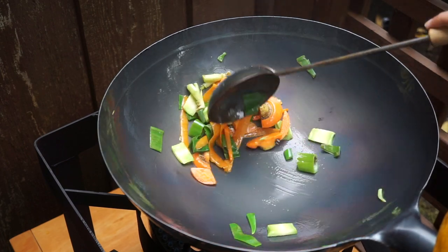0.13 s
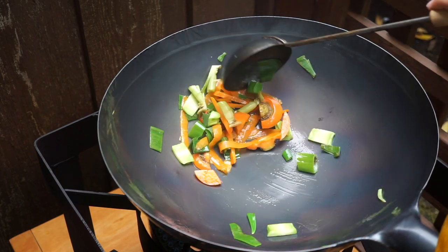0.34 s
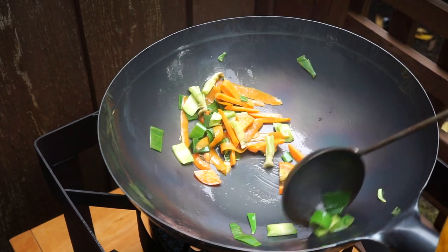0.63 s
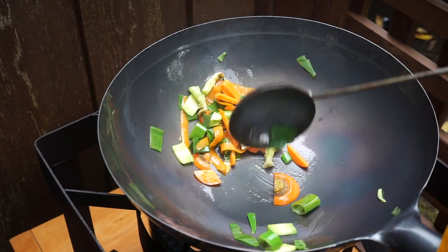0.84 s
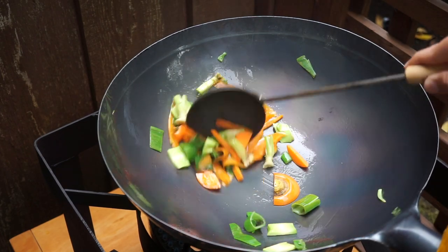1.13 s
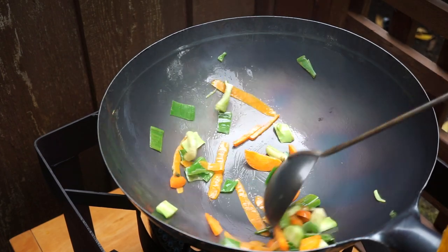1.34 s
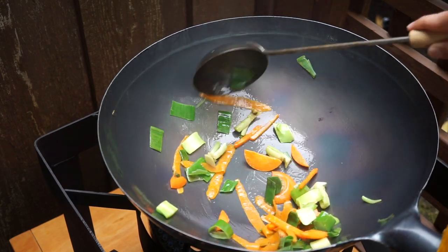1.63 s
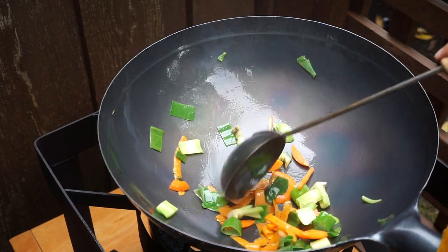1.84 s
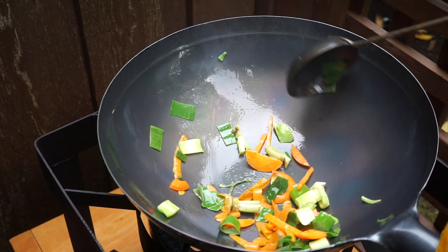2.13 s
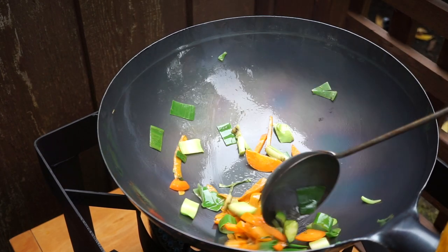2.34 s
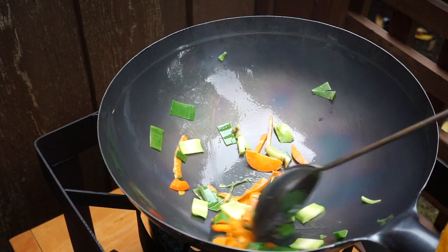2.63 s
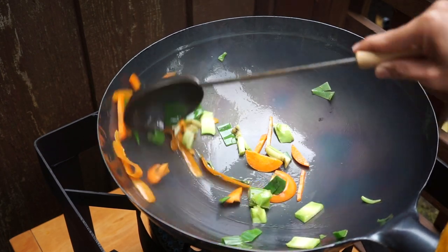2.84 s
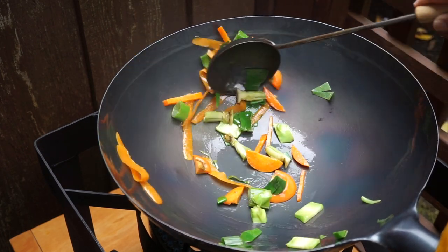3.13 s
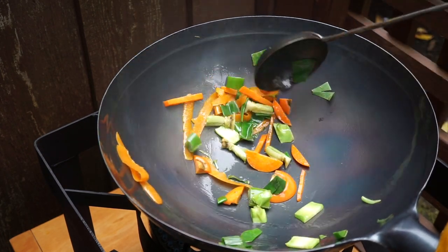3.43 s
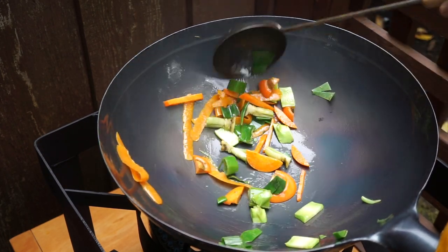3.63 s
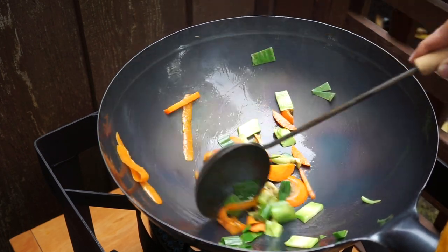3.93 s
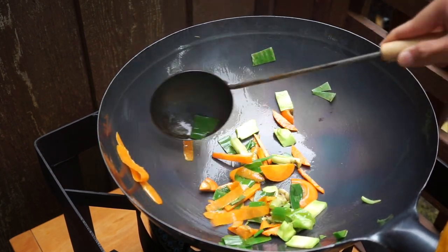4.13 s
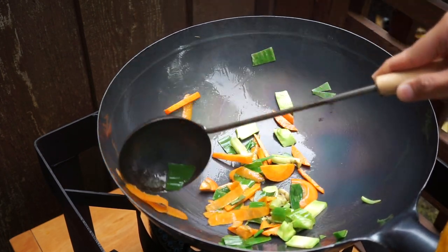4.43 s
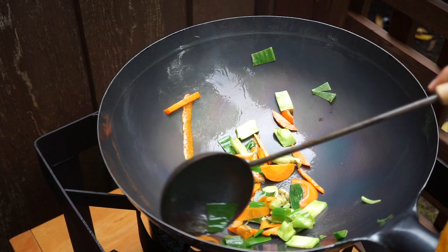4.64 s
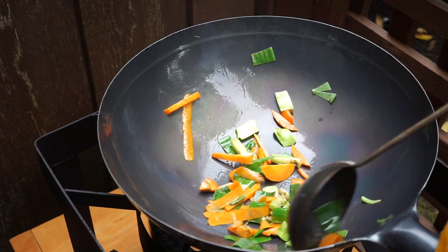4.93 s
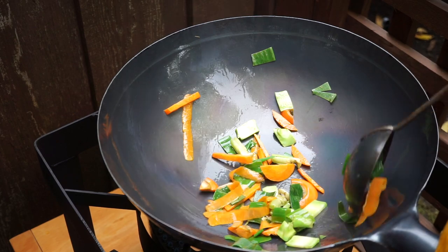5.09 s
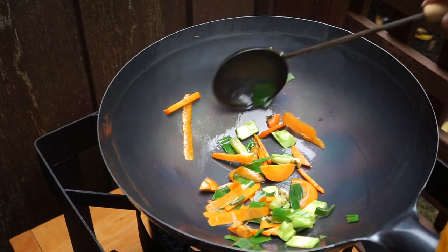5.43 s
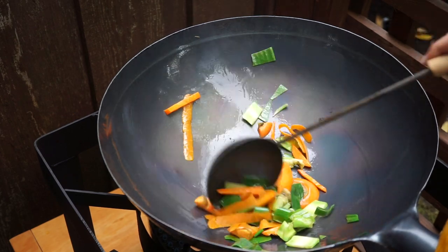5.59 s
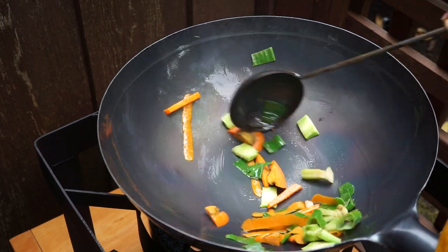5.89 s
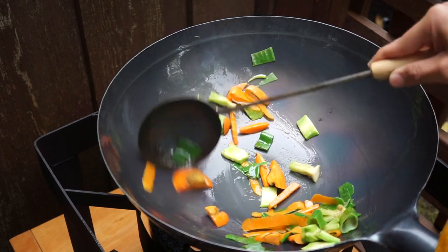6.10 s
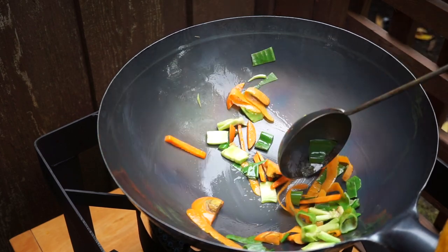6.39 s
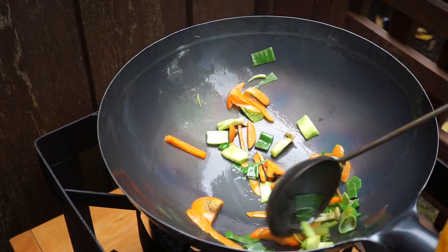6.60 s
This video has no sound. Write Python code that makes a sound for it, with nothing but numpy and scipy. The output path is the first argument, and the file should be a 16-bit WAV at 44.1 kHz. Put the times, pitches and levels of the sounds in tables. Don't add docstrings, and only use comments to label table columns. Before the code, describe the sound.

Heard very close in stereo outdoors, vegetables fry in a steel wok: constant bright steam hiss, dense fine crackle, duller bubbles and sharp random spits, slightly left of centre. A short ladle rasp opens it. At 0.4 s a hard clack and deep hollow boom start a gritty, squealing scrape lasting to about 0.75 s, leaving a thin faint rim ring. Quick knocks with low thuds come at 1.1-1.25 s, then a sharp clack at 1.7. From 2.1 to 2.35 s another strong scrape squeals; a softer drag follows at 2.65. Short rasps and clanks fall at 3.2-3.9 s. From 4.4 to 5.1 s there are only light ticks over sizzling and spits. Scraping returns with a squeal at 5.35, a knock at 5.65, a softer drag at 5.85 and a bright rasp at 6.3, then small taps while frying continues. Faint burner and air rumble stays behind.

```python
import sys
import numpy as np
from scipy import signal
from scipy.fft import rfft, irfft, next_fast_len
from scipy.io import wavfile
from scipy.ndimage import uniform_filter1d, map_coordinates

SR = 44100
rng = np.random.default_rng(int(sys.argv[2]) if len(sys.argv) > 2 else 0)


def transcribe(signal):
    frames = np.atleast_2d(signal).T
    limited = np.clip(frames, -1, 1)
    pcm = np.round(limited * 32767).astype(np.int16)
    wavfile.write(sys.argv[1], SR, pcm)


def gain_from_db(level_db):
    decades = np.asarray(level_db, float) / 20
    return 10 ** decades


N = 297675


def unit(x):
    return x / np.sqrt(np.mean(x ** 2) + 1e-20)


def along(points, hz):
    f, v = np.transpose(points)
    return np.interp(np.log(hz + 1), np.log(f + 1), v)


def curves(rows):
    start_s, *columns = np.transpose(rows)
    return [np.interp(np.arange(N) / SR, start_s, column) for column in columns]


def wobble(rate):
    knots = rng.standard_normal(int(N * rate / SR) + 4)
    return map_coordinates(knots, [np.arange(N) * rate / SR])


def filtered(x, response):
    m = next_fast_len(N + SR // 2)
    return irfft(rfft(x, m) * response(np.fft.rfftfreq(m, 1 / SR)), m)[..., :N]


def above(corner_hz, order):
    return lambda hz: (1j * hz / (corner_hz + 1j * hz)) ** order


def modes(table):
    def response(f):
        total = 0
        for k, (centre, width, db) in enumerate(table):
            resonance = 1j * f * width / (centre * centre - f * f + 1j * f * width)
            total = total + (-1) ** k * gain_from_db(db) * resonance
        return total
    return response


# pitch_hz, correlation
LIKENESS = [(25, .98), (80, .98), (150, .993), (300, .988), (600, .76), (1400, .78), (2800, .64),
            (5600, .5), (10000, .46), (14000, .2)]


def pair(a, b, colour):
    def response(hz):
        turn = np.arccos(np.clip(along(LIKENESS, hz), -1, 1)) / 2
        return colour(hz) * [np.cos(turn), np.sin(turn)]
    mid, side = filtered(np.array([a, b]), response)
    return np.array([mid + side, mid - side])


def swells(start_s, length_s, db, fade_db_per_s, slope_db=0, rise_s=.03):
    t = np.arange(N)[::32] / SR - np.asarray(start_s)[:, None]
    col = lambda v: np.reshape(v, (-1, 1))
    level_db = col(db) + col(slope_db) * np.clip(t / col(length_s), 0, 1)
    level_db = level_db - col(fade_db_per_s) * np.clip(t - col(length_s), 0, None)
    return gain_from_db(level_db) * np.clip(1 + t / col(rise_s), 0, 1) ** 2


def summed(gains):
    return np.interp(np.arange(N), np.arange(N)[::32], gains.sum(axis=0))


# centre_s, change_db, half_width_s
FLARES_AND_LULLS = [(0.039, -9, 0.039), (.345, -3.5, 0.046), (.43, -5.5, 0.024), (.82, -3.5, 0.038),
                    (1.62, -1.5, 0.056), (1.666, -4, .01), (2.1, -3, .012), (2.68, -4, 0.037), (4.157, -7, 0.029),
                    (4.3, 1, 0.028), (2.06, 0, 0.097), (2.6, -1, .03), (3.44, 5, 0.042), (3.53, -2, 0.026),
                    (3.72, -2, 0.039), (4.24, -4.5, 0.014), (4.7, -6.5, 0.025), (5.27, -6.5, 0.055),
                    (5.335, -6.5, 0.017), (5.495, -5.5, 0.045), (5.58, 3.5, 0.018), (5.7, -5.5, 0.021),
                    (6.27, -2, 0.018)]
# start_s, sizzle_db, large_bubbles_db (against the sizzle)
FRYING = [(0.0, -29, -7.5), (0.6, -32.5, -42), (0.75, -34, -19.5), (1.0, -34, -20), (1.39, -31.5, -23.5),
          (1.99, -36, -20), (2.56, -33.5, -21.5), (2.99, -31.5, -22.5), (3.36, -34.5, -20.5),
          (3.55, -36.5, -22), (3.76, -36, -22), (3.97, -32, -20), (4.68, -35, -24), (5.49, -33.5, -22.5),
          (5.71, -35, -17.5), (5.96, -29.5, -21.5), (6.75, -34.5, -26)]


def heat():
    sizzle_db, bubbles_db = curves(FRYING)
    t = np.arange(N) / SR
    sizzle_db = sizzle_db + 2.5
    for start_s, change_db, half_width_s in FLARES_AND_LULLS:
        sizzle_db = sizzle_db + change_db * np.exp(-((t - start_s) / half_width_s) ** 2)
    full_stroke = gain_from_db(-26.5)
    stir_db = 3.5 * np.tanh(sliding()[0] / full_stroke)
    return sizzle_db + stir_db, sizzle_db + bubbles_db


# start_s, peak_db, pitch_hz
SPITS = [(0.1904, -13, 8700), (0.2404, -13, 13700), (0.3104, -14, 9640), (0.4834, -16, 13700),
         (0.8016, -13, 12800), (1.0889, -14, 13100), (1.5948, -12, 10600), (2.4423, -14, 13300),
         (2.5222, -13, 13400), (2.5765, -12, 12600), (2.8984, -13, 11400), (3.0624, -14, 12500),
         (3.5004, -15, 13700), (3.8901, -13, 13700), (4.1126, -13, 13700), (4.1274, -13, 13300),
         (4.1445, -14, 13800), (4.2173, -13, 11800), (4.3344, -14, 13700), (4.4643, -14, 12900),
         (4.595, -11.5, 13900), (4.6803, -15, 13900), (5.0454, -14, 13600), (5.2111, -13, 13400),
         (5.2465, -15, 12500), (5.4645, -11, 13800), (6.0664, -13, 10100), (6.1614, -13, 13900),
         (6.2394, -12, 12400), (6.4384, -17, 13400),
         (1.5565, -17, 7500),
    (2.9092, -14, 7500),
    (5.2021, -16.5, 13400),
    (5.3279, -15, 8300),
    (5.3279, -13, 13000),
    (5.3347, -15, 13200),
    (5.5612, -16, 11700),
]


def spitting(strays=70):
    start_s, db, hz = np.transpose(SPITS)
    u = rng.random((strays, 3))
    start_s = np.r_[start_s + .001, u[:, 0] * N / SR]
    return start_s, np.r_[db, -17 + 3 * u[:, 1]], np.r_[hz, 12500 * (.85 + .25 * u[:, 2])]


def bursts(start_s, hz, cycles, size, pan_db, lag_s, length=96):
    out = []
    for ear in (.5, -.5):
        start = (start_s + ear * lag_s) * SR
        at = np.ceil(start)[:, None] + np.arange(length)
        turns = (at - start[:, None]) / SR * hz[:, None]
        wave = np.sin(2 * np.pi * turns) * np.exp(-turns / cycles[:, None])
        wave = (size * gain_from_db(ear * pan_db))[:, None] * wave
        places = np.clip(at, 0, N).astype(int)
        out.append(np.bincount(places.ravel(), wave.ravel(), N + 1)[:N])
    return np.array(out)


def crackle(count, centre_hz, spread, cycles, uneven_db, tilt=0):
    u, g = rng.random((count, 2)), rng.standard_normal((count, 4))
    hz = np.clip(centre_hz * np.exp(spread * g[:, 0]), 900, 15600)
    size = gain_from_db(-uneven_db * np.log(1 - u[:, 1] * .92)) * (hz / centre_hz) ** tilt
    damping = cycles * np.exp(0.21 * g[:, 1])
    return bursts(u[:, 0] * N / SR, hz, damping, size, 0.38 * g[:, 2], 3e-5 * g[:, 3])


def splash(x, wet_db, t60, count=6):
    t = np.arange(1, 300) / SR
    spot = np.repeat(rng.integers(count, size=N // 128 + 1), 128)[:N]
    haze = 0
    for k in range(count):
        tail = rng.standard_normal(len(t)) + 0.45 * rng.standard_normal((2, len(t)))
        tail = tail * gain_from_db(-60 * t / t60)
        tail = tail / np.linalg.norm(tail[0])
        haze = haze + signal.oaconvolve(x * (spot == k), tail, axes=1)[:, :N]
    wet = x + gain_from_db(wet_db) * haze
    fence = np.roll(wet, round(.00215 * SR), axis=1)
    return wet + gain_from_db([[-7], [-13]]) * fence


# pitch_hz, level_db (per Hz)
STEAM = [(240, -65), (400, -61), (787, -27), (1020, -18), (1750, -21), (2380, -13), (2780, -12),
         (4140, -5.5), (5470, -7), (14000, 4), (15800, -1.5)]


def sizzle():
    level_db, dull_db = heat()
    flare_db = 1.37 * wobble(25) + 1.06 * wobble(70)
    steam = unit(pair(*rng.standard_normal((2, N)), lambda hz: gain_from_db(along(STEAM, hz))))
    pops = crackle(count=8000, centre_hz=12500, spread=.25, cycles=1.5, uneven_db=5.8, tilt=.4)
    pops = unit(filtered(pops, above(3140, order=3)))
    dull = crackle(count=9000, centre_hz=3600, spread=.45, cycles=1.6, uneven_db=3.5)
    dull = unit(filtered(dull, above(1240, order=4)))
    start_s, db, hz = spitting()
    g = rng.standard_normal((len(start_s), 2))
    cycles = np.full(len(start_s), 1.7)
    spits = bursts(start_s, np.clip(hz, 900, 14500), cycles, gain_from_db(db + 4.7), 1.2 * g[:, 0] + .8, 1e-5 * g[:, 1])
    spits = filtered(spits, above(2600, order=4))
    bubbles = gain_from_db(level_db + flare_db - 5) * pops + gain_from_db(dull_db + flare_db) * dull + spits
    bubbles = filtered(splash(bubbles, wet_db=-3.5, t60=0.0072), above(770, order=3))
    frying = gain_from_db(level_db + flare_db - 0.5) * steam + bubbles
    return frying * gain_from_db([[.45], [-.45]])


# start_s, length_s, rasp_db, swell_db (along the stroke), cup_hum_db (against the rasp)
STROKES = [(0.0, 0.059, -29.5, -9.5, -16.5), (0.38, 0.15, -30.5, -5.5, -15.5), (0.534, 0.22, -28.5, 1, -38),
           (.81, 0.18, -44, -1, -14), (1.089, 0.14, -43.5, 0, -15), (1.235, 0.059, -33, 3, -17.5),
           (1.674, 0.031, -27.5, -17, -13), (1.726, 0.11, -43.5, -2, -17), (2.11, 0.24, -30.5, 5, -25.5),
           (2.64, 0.37, -38, -0.5, -15), (3.225, 0.07, -35, 0, -22), (3.398, .045, -33, 0.5, -19),
           (3.747, 0.038, -27.5, -9.5, -18), (3.833, 0.2, -29, -21, -23), (5.365, 0.064, -26.5, -1, -30),
           (5.571, 0.22, -44.5, 2, -17), (5.826, 0.28, -37.5, -11, -13.5), (6.296, 0.11, -26, -10, -25.5)]


def sliding():
    start_s, length_s, db, swell_db, hum_db = np.transpose(STROKES)
    start_s, rise_s = struck(start_s, soft_s=0.022)
    gains = swells(start_s, length_s, db, 400, swell_db, rise_s)
    return np.array([summed(gains), summed(gains * gain_from_db(hum_db)[:, None])])


def grit(density):
    catches = rng.random(N) < density
    return unit(rng.standard_normal(N) * (1 + 6 * catches))


def patchy(x, depth_db):
    z = signal.stft(x, nperseg=256)[2]
    field = uniform_filter1d(rng.standard_normal(z.shape[1:]), size=3, axis=0)
    field = uniform_filter1d(field, size=12, axis=1)
    return signal.istft(z * gain_from_db(depth_db * unit(field)), nperseg=256)[1][:, :N]


# start_s, edge_hz
EDGE = [(0, 3000), (.38, 3720), (.5, 3700), (.56, 3350), (.62, 3750), (.8, 3650), (1.25, 3300), (1.7, 3700),
        (2.2, 3340), (2.33, 3400), (2.36, 3900), (3.25, 3580), (3.42, 2900), (3.76, 4000), (3.85, 3000),
        (5.4, 2850), (6.3, 3700), (6.38, 3250)]


def radiated(x):
    hz, t, z = signal.stft(x, SR, nperseg=256)
    edge_hz = np.interp(t, *np.transpose(EDGE))
    z = z / np.sqrt(1 + (edge_hz / (hz[:, None] + 1)) ** 16)
    return signal.istft(z, SR, nperseg=256)[1][:, :N]


# pitch_hz, width_hz, level_db
WALL = [(2980, 160, -6.5), (3150, 44, -7), (3515, 67, 0.5), (3914, 110, 2.5), (4040, 33, 4.5),
        (4260, 230, 2.5), (4543, 160, 3), (4420, 25, -6), (4745, 64, 2.5), (5106, 137, 4.5), (5480, 107, 2),
        (5800, 300, -6), (6440, 110, -5), (6390, 450, 2.5), (7400, 700, -6), (6860, 120, -7),
        (8630, 370, -3.5), (8910, 340, -2), (10900, 1000, -4.5), (13300, 1400, -7)]
# pitch_hz, width_hz, level_db
CUP = [(1095, 77, -0.5), (1267, 18, 4.5), (1695, 140, 4), (2110, 48, 6.5), (2604, 42, 6.5)]


def ladle():
    force, hum = sliding() * gain_from_db(1.2 * wobble(60) - 1.5)
    cup, wall = modes(CUP), modes(WALL)
    rub = np.array([grit(.006), grit(.0066)])
    blows, shake = np.zeros((2, N)), rng.standard_normal((2, N))
    t = np.arange(400) / SR
    for start_s, db, _, ring_db, _ in KNOCKS:
        blow = gain_from_db(db + ring_db - 1.5 - 60 * t / 0.0033) * rng.standard_normal((2, 400))
        blows[:, round(start_s * SR):][:, :400] += blow
    drive = (patchy(force * rub, depth_db=2) + blows) / np.std(filtered(rub[0], wall))
    rasp = radiated(pair(*drive, wall))
    cup_drive = gain_from_db(-0.5) * hum * shake / np.std(filtered(shake[0], cup))
    return rasp + pair(*cup_drive, cup)


# start_s, length_s, pitch_hz, level_db
SQUEALS = [(.378, 0.032, 4620, -35), (.385, .03, 250, -39), (.405, .03, 195, -37.5), (.5, .09, 190, -50),
           (0.533, 0.03, 4400, -37), (.575, 0.033, 4900, -38), (0.63, 0.07, 215, -45.5),
           (.74, 0.073, 240, -44.5), (0.64, 0.054, 5120, -37), (.65, 0.047, 4180, -37),
           (0.714, 0.036, 5100, -38), (0.602, 0.16, 6310, -38.5), (1.103, .05, 190, -37),
           (1.252, 0.034, 195, -37.5), (1.245, 0.048, 3490, -42.5), (2.645, .12, 440, -57),
           (1.675, 0.034, 5000, -39), (2.11, 0.035, 5040, -40), (2.13, 0.13, 835, -57.5),
           (2.15, .13, 1280, -56.5), (2.13, 0.084, 1410, -58), (2.21, .13, 1050, -59.5),
           (2.165, 0.027, 215, -36.5), (2.19, 0.065, 3515, -37.5), (2.2, 0.05, 5040, -35),
           (2.23, .04, 4400, -32), (2.21, .07, 6600, -40), (2.317, 0.033, 6240, -36),
           (2.32, .02, 4250, -37), (2.345, 0.042, 3950, -38), (2.35, 0.027, 215, -50),
           (3.747, 0.036, 4350, -38.5), (3.842, 0.0082, 4000, -27.5), (5.374, 0.095, 5058, -40),
           (5.35, 0.045, 4100, -39), (5.362, .035, 11300, -35), (5.41, .03, 3850, -39),
           (5.365, 0.06, 1690, -48), (5.38, 0.04, 1100, -55.5), (5.37, 0.052, 6445, -39),
           (6.115, 0.033, 4100, -41.5), (6.296, 0.013, 4420, -39), (6.296, .015, 4880, -39),
           (7.3, .02, 6750, -41), (6.31, .035, 3900, -37), (6.35, .012, 5420, -37), (6.36, .015, 5030, -39),
           (6.35, 0.025, 2150, -51), (6.37, .05, 1260, -59), (6.395, .015, 3600, -43)]


def squeal():
    start_s, length_s, hz, db = np.transpose(SQUEALS)
    start_s, rise_s = struck(start_s, soft_s=.008)
    fade_db_per_s = np.where(hz < 400, 262, 800)
    gains = swells(start_s, length_s, db, fade_db_per_s, rise_s=rise_s)
    t = np.arange(N) / SR
    shiver = np.array([wobble(150), wobble(150)])
    flutter = np.array([wobble(70), wobble(70)])
    lines = 0
    for gain, f in zip(gains, hz):
        phase = 2 * np.pi * f * t + min(f / 2500, 1.5) * shiver + f
        lines = lines + summed(gain[None]) * np.sin(phase)
    return pair(*(lines * gain_from_db(2.5 + 2.5 * flutter)), np.ones_like)


# start_s, peak_db, pitch_hz
HANDLE_TICK = (3.006, -28, 3220)
# start_s, peak_db, boom_db, ring_db (both against the peak), clink_hz
KNOCKS = [(0.06, -32, -36, -6, 2440), (0.3773, -21.5, -5, 8, 940), (.39, -29, -30, 0, 2200),
          (.8486, -34, -40, -4, 3300), (1.089, -32.5, 9, -8, 3150), (1.113, -24.5, -2, 3.5, 3150),
          (1.171, -33, 1, 6, 1840), (1.239, -24.5, -2, 6, 2750), (1.346, -34.5, -27, -9, 2680),
          (1.6745, -23.5, -6.5, 0, 2370), (2.11, -27.5, 1.5, 15, 1900), (2.156, -30, 4, -4, 2030),
          (2.333, -37, -30, 0, 3900), (2.643, -32, 2, -1, 3120), (3.312, -28, -24, -9, 2310),
          (3.435, -31, -11, -9, 2920), (3.7475, -28, -8, 8, 2920), (3.841, -27, -15, 12, 917),
          (4.435, -42, -40, -9, 1200), (4.742, -39, -40, -9, 2500), (4.869, -28.5, -40, -7, 2340),
          (4.965, -33.5, -40, -9, 1900), (5.025, -31, -40, -7, 2400), (5.092, -39, -30, -9, 1410),
          (5.66, -23, -12, 6.5, 2960), (6.24, -29.5, -33, 2, 2730), (6.44, -34, -40, 4, 4800),
          (6.499, -31.5, -30, -4, 2220)]


def knocks():
    clack, deep, clink = np.zeros((2, N)), np.zeros((2, N)), np.zeros(N)
    t = np.arange(900) / SR
    for start_s, db, _, _, hz in KNOCKS:
        at = round(start_s * SR)
        crack = gain_from_db(db + 6.5 - 60 * t / .012) * (rng.standard_normal((2, 900)) + 5 * (t == 0))
        clack[:, at:][:, :900] += crack
        deep[:, at:][:, :900] += gain_from_db(0.4 * (db + 22)) * crack
        tone = np.sin(2 * np.pi * hz * t) * (1 - np.exp(-t / 0.00035))
        clink[at:][:900] += gain_from_db(db - 9.5 - 60 * t / 0.034) * tone
    start_s, db, hz = HANDLE_TICK
    tone = np.sin(2 * np.pi * hz * t) * (1 - np.exp(-t / 0.0007))
    clink[round(start_s * SR):][:900] += gain_from_db(db - 60 * t / 0.035) * tone
    broad = modes([(2300, 1800, -3), (5000, 4000, -5)])
    clack = pair(*clack, lambda hz: broad(hz) * above(900, order=2)(hz) * 1.3)
    return clink + clack + pair(*deep, modes([(1050, 450, -4)]))


def struck(start_s, soft_s):
    blows = np.transpose(KNOCKS)[0]
    nearest = blows[np.abs(start_s[:, None] - blows).argmin(axis=1)]
    hard = np.abs(nearest - start_s) < .019
    return np.where(hard, nearest, start_s), np.where(hard, .001, soft_s)


# start_s, length_s, boom_db, fade_db_per_s
DRAGS = [(0.0, 0.0071, -51, 200), (.377, 0.037, -30.5, 160), (0.46, 0.038, -46, 100),
         (0.575, 0.21, -47, 99), (1.084, 0.0091, -32.5, 130), (1.238, 0.0083, -37, 173),
         (1.67, 0.03, -37.5, 110), (2.11, 0.018, -32.5, 106), (2.167, 0.034, -34, 165),
         (2.34, 0.019, -50.5, 115.5), (2.643, 0.052, -39, 170), (2.75, .03, -50, 250),
         (2.948, 0.054, -59, 152), (3.204, 0.024, -46, 71), (3.372, 0.035, -54, 97),
         (3.744, 0.058, -51, 92), (3.865, 0.097, -54.5, 245), (4.017, .03, -55.5, 150),
         (4.364, 0.04, -51, 146), (4.777, 0.36, -68, 100), (5.343, 0.095, -49, 200),
         (5.502, 0.017, -48, 200), (5.58, 0.036, -41, 107), (5.836, 0.015, -46.5, 120),
         (5.919, 0.026, -57.5, 150), (6.088, 0.058, -47, 250), (6.198, .07, -55.5, 150),
         (6.292, 0.11, -44, 197), (6.615, 0.051, -46.5, 150)]


def pressing():
    settle_s = 0.011
    start_s, length_s, db, fade_db_per_s = np.transpose(DRAGS)
    start_s, rise_s = struck(start_s, settle_s)
    gains = swells(start_s, length_s, db, fade_db_per_s, rise_s=rise_s)
    upper_db = -14 - 6 * (rise_s == settle_s)
    return np.array([summed(gains), summed(gains * gain_from_db(upper_db)[:, None])])


# pitch_hz, width_hz, level_db
BOWL = [(75, 6.3, -23), (105, 14, -23), (146.5, 11, -7), (190, 17.8, 2.5), (237.3, 14, 2.5),
        (275.6, 11, -3.5), (308, 40.4, -10.5)]
# pitch_hz, width_hz, level_db
UPPER_BOWL = [(359.7, 4.4, -1.5), (396, 19, 1), (425, 19.6, -1.5), (469, 15, 0), (550, 54, -10),
              (670, 22, -5), (754, 46, -10), (851, 9.6, -1.5)]


def boom():
    bowl, upper = modes(BOWL), modes(UPPER_BOWL)
    weight, sharp = pressing() * gain_from_db(1.3 * wobble(30) - 2.5)
    push = rng.standard_normal((2, N))
    thumps = np.zeros(N)
    for start_s, db, boom_db, _, _ in KNOCKS:
        thumps[round(start_s * SR)] = gain_from_db(db + boom_db + 40)
    soft = np.convolve(thumps, np.hanning(60) / 30)[:N]
    low_drive = weight * push / np.std(filtered(push, bowl)) + soft
    upper_drive = sharp * push / np.std(filtered(push, upper)) + gain_from_db(-12) * soft
    return pair(*low_drive, bowl) + pair(*upper_drive, upper)


# start_s, length_s, level_db, fade_db_per_s
RIM_SONG = [
    (.62, .68, -57, 100),
    (2.23, .04, -61, 70),
]


def rim():
    song = pair(*rng.standard_normal((2, N)), modes([(1255, 7, -2), (1799, 8, 1.5)]))
    return summed(swells(*np.transpose(RIM_SONG), rise_s=0.14)) * unit(song)


# pitch_hz, level_db (per Hz)
AIR = [(12, -31), (20, 3.5), (60, -4.5), (134, 2.5), (270, -3.5), (313, -8), (339, -10), (406, -7.5),
       (1000, -13), (1300, -26), (2200, -120)]
# start_s, rumble_db
SHAKE = [(0.0, -66), (0.38, -70), (0.56, -63), (0.94, -71), (1.16, -69), (1.52, -77), (2.2, -72),
         (2.29, -68), (2.5, -75), (2.86, -71), (2.97, -75), (3.78, -79), (3.91, -71), (4.14, -79),
         (5.08, -76), (5.36, -80), (5.79, -70), (6.75, -72)]


def outdoors():
    rumble = unit(pair(*rng.standard_normal((2, N)), lambda hz: gain_from_db(along(AIR, hz)) * (hz > 15)))
    shake_db, = curves(SHAKE)
    level_db = -66.5 + .7 * (shake_db - shake_db.mean())
    level_db = level_db - .4 * np.arange(N) / SR
    return gain_from_db(level_db + 1.2 * wobble(6)) * rumble


def scene():
    return sizzle() + ladle() + squeal() + knocks() + boom() + rim() + outdoors()


def top_cut(x):
    return signal.sosfilt(signal.butter(12, 17080, fs=SR, output="sos"), x)


def record(dry):
    mix = filtered(dry, lambda hz: gain_from_db(3.1 * (hz / 15000) ** 6) * (hz < 15850))
    return top_cut(mix)


dry = scene()
out = record(dry)
transcribe(out)
```